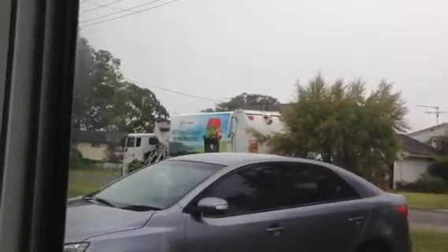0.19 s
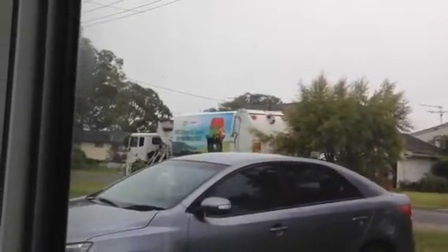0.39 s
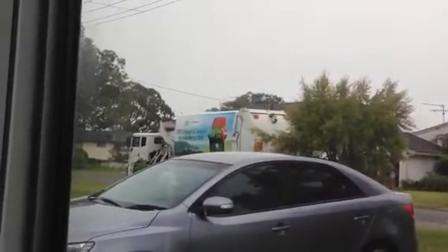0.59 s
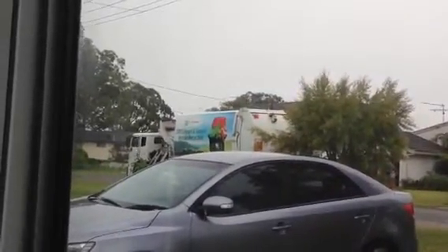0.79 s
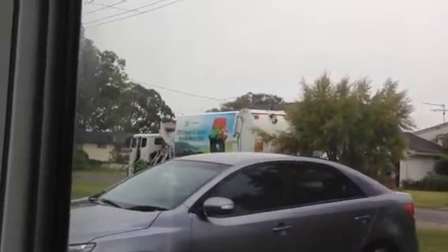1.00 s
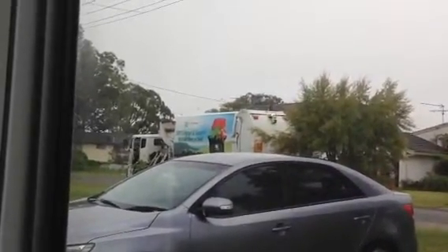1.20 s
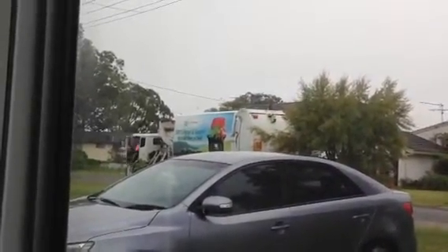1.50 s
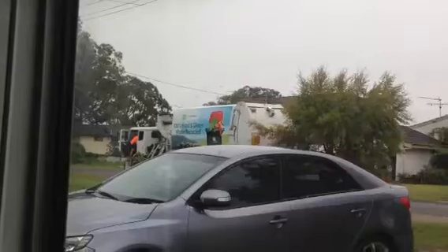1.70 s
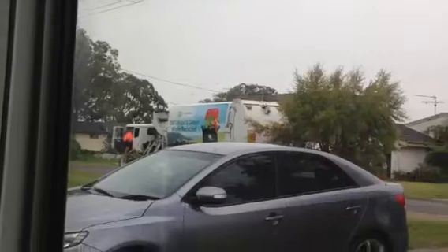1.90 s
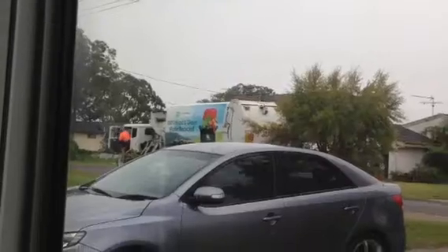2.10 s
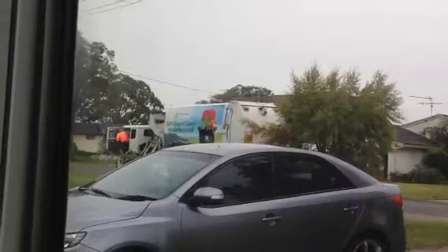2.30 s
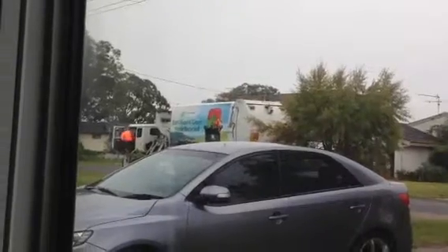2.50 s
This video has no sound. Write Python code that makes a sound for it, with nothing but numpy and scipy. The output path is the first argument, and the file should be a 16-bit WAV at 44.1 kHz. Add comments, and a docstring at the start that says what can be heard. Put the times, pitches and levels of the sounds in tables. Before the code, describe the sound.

A large truck's air brake blasts a short loud hiss while its diesel engine idles steadily

```python
"""A garbage truck stands across a suburban street, its six-cylinder diesel idling from start to end.
Harmonic exhaust tones and puffs of noise lie under an uneven, ringing clatter and a gear whine.
From 0.2 s its air valve blows off for half a second, as a jet of noise with resonances.
Meanwhile the brakes groan in short, wavering tones and the chassis knocks in bursts of noise.
The houses return the brake sounds as delayed copies and a diffuse tail; a faint noise fills the street."""
import sys
import numpy as np
from scipy import signal
from scipy.fft import rfft, irfft
from scipy.io import wavfile

SR = 44100
rng = np.random.default_rng(int(sys.argv[2]) if len(sys.argv) > 2 else 0)


def materialize(psi):
    """Save the field psi as 16-bit PCM at rate SR to the path in sys.argv[1].

    A 1-D psi becomes a single channel; in a 2-D psi each row is a channel.
    """
    bounded = np.clip(np.atleast_2d(psi).T, -1, 1)
    quanta = np.round(bounded * 32767).astype(np.int16)
    wavfile.write(sys.argv[1], SR, quanta)


N = 114660
T = np.arange(N) / SR
HZ = np.maximum(np.fft.rfftfreq(N, 1 / SR), 1)


def from_db(db):
    """Amplitude gain is the inverse of the logarithmic decibel scale."""
    return 10 ** (np.asarray(db) / 20)


def rms_one(x):
    """Mean-square normalisation brings a signal to unit power."""
    return x / np.sqrt(np.mean(x ** 2) + 1e-20)


def curve(rows):
    """Linear interpolation joins (s, value) rows."""
    return np.interp(T, *np.transpose(rows))


def white():
    """White noise: independent samples, hence a flat expected spectrum."""
    return rng.standard_normal(N)


def colour(x, spectrum):
    """Spectral weighting: dB joined over log frequency shape the signal, at unit power."""
    hz, db = np.transpose(spectrum)
    gain = from_db(np.interp(np.log(HZ), np.log(hz), db))
    return rms_one(irfft(rfft(x) * gain, N))


def low_pass(x, hz):
    """Second-order Butterworth low-pass: maximally flat below its cutoff."""
    return signal.sosfilt(signal.butter(2, hz, fs=SR, output="sos"), x)


def resonate(x, hz, width_hz):
    """Damped resonance: a pole pair whose radius sets the bandwidth, at unit power."""
    radius = np.exp(-np.pi * width_hz / SR)
    poles = [1, -2 * radius * np.cos(2 * np.pi * hz / SR), radius * radius]
    return rms_one(signal.lfilter([1, 0, -1], poles, x))


def ring(x, modes):
    """Modal superposition: resonances in parallel, their sum at unit power."""
    return rms_one(sum(from_db(db) * resonate(x, hz, width) for hz, width, db in modes))


def burst(start, length, attack, release):
    """Transient envelope in seconds: linear attack, hold to the length, exponential release."""
    rise = np.clip((T - start) / attack, 0, 1)
    return rise * np.exp(-np.maximum(T - start - length, 0) / release)


# Idle speed. Each row: time in seconds, firings per second.
IDLE_SPEED = [(0, 41.93), (.5, 42.0), (1.15, 42.27), (1.8, 42.42), (2.6, 42.43)]
START_FIRING, CYLINDERS = .18, 6


def crank_position():
    """Phase is the integral of rate: firings counted from the idle speed."""
    return START_FIRING + np.cumsum(curve(IDLE_SPEED)) / SR


# Strengths of the cylinders in firing order. Each row: exhaust puff in dB, block knock in dB,
# cover clatter in dB, injector tick in dB, all relative.
CYLINDER_STRENGTHS = [(-1.5, 0.5, 4.5, -1.5), (1.5, -1, 2, -2), (0.5, -9, -2, -1.5), (-1.5, -2, 2.5, -0.5),
                      (4, -2, -5, -2.5), (-3.5, 2.5, -2.5, -2.5)]
PUFF_STRENGTHS, BLOCK_STRENGTHS, COVER_STRENGTHS, TICK_STRENGTHS = np.transpose(CYLINDER_STRENGTHS)


def firing_bursts(crank, strengths_db, lag, decay, alike):
    """Cyclic excitation: noise decays from each firing (lag, decay in firings); a power share repeats by cycle."""
    place = (crank - lag) % CYLINDERS
    cycle = rng.standard_normal(int(CYLINDERS * SR / IDLE_SPEED[0][1]))
    same = cycle[(place / CYLINDERS * len(cycle)).astype(int) % len(cycle)]
    rattle = np.sqrt(alike) * same + np.sqrt(1 - alike) * white()
    strength = from_db(strengths_db)[place.astype(int) % CYLINDERS]
    return rattle * strength * np.exp(-(place % 1) / decay)


# Exhaust tones. Each row: multiple of the firing rate, level in dB.
EXHAUST_TONES = [(1, -45.5), (2, -58), (3, -62), (3.5, -63.5), (5, -61), (6, -66.5), (8.5, -70),
                 (10, -70.5)]
EXHAUST_LAG = 0.481  # firings


def exhaust_throb(crank):
    """Fourier synthesis: tones on whole and half multiples of the firing rate, alternating in sign."""
    throb = 0
    for i, (multiple, db) in enumerate(EXHAUST_TONES):
        tone = np.cos(np.pi * round(2 * multiple) * (crank - EXHAUST_LAG))
        throb = throb + np.sqrt(2) * from_db(db) * tone * (-1) ** i
    return throb


# Spectrum of the exhaust puffs. Each row: frequency in Hz, relative level in dB.
PUFF_SPECTRUM = [(25, -42), (50, -14), (70, 1), (100, 0.5), (140, -2.5), (170, -4.5), (202, 5.5), (235, -3),
                 (290, -7.5), (320, -10.5), (360, -10.5), (440, -6.5), (510, -22), (800, -13.5),
                 (1200, -19), (2500, -58)]
PUFF_DB = -52.5


def exhaust_puffs(crank):
    """Pulsed flow noise: each firing sends a coloured puff from the exhaust."""
    puffs = firing_bursts(crank, PUFF_STRENGTHS, lag=0.16, decay=1.16, alike=0.26)
    return from_db(PUFF_DB) * colour(puffs, PUFF_SPECTRUM)


# Modes of the block. Each row: frequency in Hz, width in Hz, relative level in dB.
BLOCK_MODES = [(1008, 86, 6.5), (1077, 84, -13), (632, 43, -3.5), (708, 65, -9.5)]
BLOCK_DB = -57


def block_knock(crank):
    """Forced modal vibration: the firings knock the block into ringing."""
    knocks = firing_bursts(crank, BLOCK_STRENGTHS, lag=-.12, decay=0.38, alike=0.58)
    return from_db(BLOCK_DB) * ring(knocks, BLOCK_MODES)


# Modes of the covers. Each row: frequency in Hz, width in Hz, relative level in dB.
COVER_MODES = [(1609, 31, 3), (1708, 28, 1), (1925, 22, 3.5), (1856, 89, -6.5), (2300, 92, -5),
               (2400, 220, -9.5), (3820, 35, -2)]
COVER_DB = -51.5


def cover_clatter(crank):
    """Forced modal vibration: the firings rattle the lightly damped covers."""
    rattles = firing_bursts(crank, COVER_STRENGTHS, lag=.03, decay=1.0, alike=0.54)
    return from_db(COVER_DB) * ring(rattles, COVER_MODES)


# Spectrum of the injector ticks. Each row: frequency in Hz, relative level in dB.
TICK_SPECTRUM = [(600, -11.5), (1250, -0.5), (1420, -22), (1700, 8), (2050, 4.5), (2450, 7.5), (2670, -10),
                 (3000, 2.5), (3500, -3), (4050, 0.5), (4500, -7.5), (5100, -2), (5450, -6), (5800, -2),
                 (6300, -5.5), (7500, -11.5), (10000, -16), (12500, -22.5), (15500, -23)]
TICK_DB = -49.5


def injector_ticks(crank):
    """Amplitude modulation: bright noise steps in strength from cylinder to cylinder."""
    ticks = firing_bursts(crank, TICK_STRENGTHS, lag=.04, decay=18, alike=0.17)  # hardly decays
    return from_db(TICK_DB) * colour(ticks, TICK_SPECTRUM)


# Lines of the timing gears. Each entry: multiple of the engine cycle rate.
GEAR_ORDERS = [141, 142, 153, 154, 226, 241, 272]
# Starting strengths of the same lines. Each entry: level in dB, before the clatter level.
GEAR_DB = [-58.5, -68, -66.5, -67.5, -60, -62.5, -56.5]
# Fades of the same lines once the truck has settled. Each entry: fall in dB per second (negative rises).
GEAR_FADES = [-1, 6, -7, -6, 2, 1, 25]
GEAR_FADE_FROM_S = 1.65
GEAR_WAVER_DB, GEAR_WAVER_HZ = 2, 16  # rms depth, cutoff of the wavering


def gear_whine(crank):
    """Order-locked tones: timing gears whine on multiples of the engine cycle, each wavering in level."""
    settled = np.maximum(T - GEAR_FADE_FROM_S, 0)
    whine = 0
    for order, db, fade in zip(GEAR_ORDERS, GEAR_DB, GEAR_FADES):
        waver_db = GEAR_WAVER_DB * rms_one(low_pass(white(), GEAR_WAVER_HZ))
        level_db = db - fade * settled + waver_db
        turns = order * crank / CYLINDERS + rng.random()
        whine = whine + np.sqrt(2) * from_db(level_db) * np.sin(2 * np.pi * turns)
    return whine


# Level of the engine's clatter. Each row: time in seconds, gain in dB.
CLATTER_LEVEL = [(0, -3), (.2, -1), (.9, 0), (1.7, 0), (2.6, -0.5)]


def engine():
    """Superposition: exhaust and mechanical sources share one crank phase."""
    crank = crank_position()
    clatter = block_knock(crank) + cover_clatter(crank) + injector_ticks(crank) + gear_whine(crank)
    return exhaust_throb(crank) + exhaust_puffs(crank) + from_db(curve(CLATTER_LEVEL)) * clatter


# Spectrum of the street. Each row: frequency in Hz, relative level in dB.
STREET_SPECTRUM = [(20, -17), (60, -10), (200, -34), (500, -11), (1500, -8), (5000, -9), (9000, -36),
                   (15500, -41)]
STREET_DB = -57.5


def street_noise():
    """Stationary noise: a steady coloured background."""
    return from_db(STREET_DB) * colour(white(), STREET_SPECTRUM)


# Spectrum of the jet's hiss. Each row: frequency in Hz, relative level in dB.
AIR_SPECTRUM = [(100, -19), (280, -5.5), (450, -14.5), (750, -22.5), (1150, -24), (1450, -15), (1850, -4.5),
                (2400, -0.5), (2650, -2), (2950, -6), (3450, 2.5), (4200, 1), (5200, 0), (6000, 2),
                (6900, -2), (8300, -3.5), (10000, -4.5), (12000, -12.5), (15300, -15.5)]
# Resonances of the valve and its pipe. Each row: frequency in Hz, width in Hz, relative level in dB.
VALVE_MODES = [(1813, 18, -7), (2207, 16, -9), (2350, 35, -4), (2490, 50, -7), (3213, 16, -8),
               (3351, 20, -8), (3549, 27, -5), (3879, 25, -7), (4084, 22, -6), (4206, 18, -5),
               (4593, 16, -5), (4774, 16, -7), (4840, 16, -7), (5061, 14, -8), (5856, 16, -6),
               (5926, 16, -6)]
VALVE_DB = -6.5  # relative to the hiss
DULL_FROM_S, DULL_DB_PER_S, DULL_ABOVE_HZ = 0.53, 31, 3800


def air_jet():
    """Turbulent jet noise with pipe resonances; its treble fades as the pressure drops."""
    jet = colour(white(), AIR_SPECTRUM) + from_db(VALVE_DB) * ring(white(), VALVE_MODES)
    body = irfft(rfft(jet) / (1 + (HZ / DULL_ABOVE_HZ) ** 8), N)
    treble = jet - body
    return body + treble * from_db(-DULL_DB_PER_S * np.maximum(T - DULL_FROM_S, 0))


RUMBLE_DB, RUMBLE_HZ, RUMBLE_WIDTH_HZ = -20, 147, 96  # level before the air flow, width per pass


def air_flutter():
    """Narrow-band noise: two resonance passes give the jet's low flutter."""
    once = resonate(white(), RUMBLE_HZ, RUMBLE_WIDTH_HZ)
    return from_db(RUMBLE_DB) * resonate(once, RUMBLE_HZ, RUMBLE_WIDTH_HZ)


# Whistles of the valve. Each row: start in seconds, length in seconds, level in dB.
WHISTLES = [(0.22, 0.025, -31), (0.618, 0.076, -25.5)]
WHISTLE_HZ, WHISTLE_WIDTH_HZ = 5920, 1400  # width per pass


def valve_whistle():
    """Narrow-band noise: the jet narrows to a rough whistle as the valve opens and closes."""
    once = resonate(white(), WHISTLE_HZ, WHISTLE_WIDTH_HZ)
    whistle = resonate(once, WHISTLE_HZ, WHISTLE_WIDTH_HZ)
    level = sum(from_db(db) * burst(start, length, attack=0.013, release=0.01)
                for start, length, db in WHISTLES)
    return level * whistle


# Air flow through the brake valve. Each row: time in seconds, level in dB.
AIR_FLOW = [(.17, -57), (.195, -42.5), (.214, -25), (.24, -20.5), (.275, -22), (.33, -25), (.36, -19),
            (.46, -20), (.525, -21), (.57, -19.5), (.615, -21), (.655, -23), (.697, -23), (.725, -30),
            (.76, -46), (.8, -87)]


def air_brake():
    """Flow modulation: the air flow sets the level of jet and flutter; the whistle adds to them."""
    return from_db(curve(AIR_FLOW)) * (air_jet() + air_flutter()) + valve_whistle()


# Brake judders. Each row: start in seconds, length in seconds, level in dB, mean pitch in Hz.
GROANS = [(0.237, 0.048, -27.5, 197), (0.291, 0.026, -35.5, 203), (0.366, 0.015, -27.5, 200),
          (0.418, 0.056, -34, 203), (0.541, 0.035, -28, 201.1), (0.675, 0.049, -46, 202.4),
          (.765, 0.094, -48, 211)]
GROAN_ATTACK_S, GROAN_RELEASE_S = 0.014, 0.012
GROAN_WAVER = .025  # rms share of the pitch


def brake_groan():
    """Friction-driven vibration: shoes grab the drums in short low tones, modulated in frequency."""
    waver = 1 + GROAN_WAVER * rms_one(low_pass(white(), 64))
    warped_time = np.cumsum(waver) / SR
    groan = 0
    for start, length, db, hz in GROANS:
        envelope = burst(start, length, GROAN_ATTACK_S, GROAN_RELEASE_S)
        groan = groan + np.sqrt(2) * from_db(db) * envelope * np.sin(2 * np.pi * hz * warped_time)
    return groan


# Chassis knocks. Each row: start in seconds, level in dB.
CLUNKS = [(0.242, -38), (.27, -42.5), (.568, -34), (.7, -40)]
# Spectrum of the knocks. Each row: frequency in Hz, relative level in dB.
CLUNK_SPECTRUM = [(30, -27), (80, 6), (150, 6), (300, -5), (600, 6.5), (1000, -0.5), (1800, 6), (3000, -3),
                  (6000, -36)]


def chassis():
    """Impact noise: short coloured bursts as the chassis settles."""
    level = sum(from_db(db) * burst(start, 0.025, attack=0.002, release=0.035) for start, db in CLUNKS)
    return colour(white(), CLUNK_SPECTRUM) * level


# Echoes of the house fronts. Each row: delay in seconds, level in dB.
ECHOES = [(.105, -20.5), (.19, -29), (.345, -28.5)]
# Colour of the street's tail. Each row: frequency in Hz, relative level in dB.
TAIL_SPECTRUM = [(100, -2), (1000, -4), (2400, 1.5), (3800, 3.5), (5200, -2), (7000, -9), (10000, -6),
                 (15000, -8)]
STREET_T60_S, TAIL_DB, ECHO_CUT_HZ = 1, -19.5, 13700


def street_echo(x):
    """Convolution with an impulse response: discrete reflections and an exponentially decaying tail."""
    tail = colour(white(), TAIL_SPECTRUM) * from_db(-60 * T / STREET_T60_S) * (T > .02)
    tail = from_db(TAIL_DB) * tail / np.sqrt(np.sum(tail ** 2))
    slaps = np.zeros(N)
    for delay, db in ECHOES:
        slaps[int(delay * SR)] += from_db(db)
    return signal.fftconvolve(x, tail + low_pass(slaps, ECHO_CUT_HZ))[:N]


def scene():
    """Superposition of truck and street, alike in both channels; only the brake sounds echo."""
    brakes = air_brake() + brake_groan() + chassis()
    mid = engine() + street_noise() + brakes + street_echo(brakes)
    return np.array([mid, mid])


CUTOFF_HZ = 15250


def record(dry):
    """Band limitation: a steep elliptic low-pass removes the top."""
    return signal.sosfilt(signal.ellip(12, .1, 90, CUTOFF_HZ, fs=SR, output="sos"), dry)


dry = scene()
out = record(dry)
materialize(out)
```